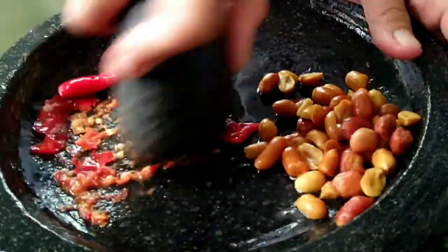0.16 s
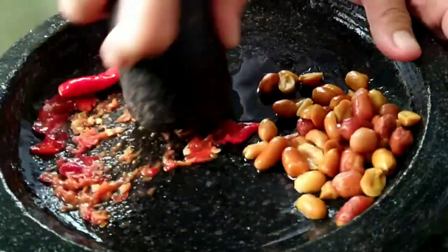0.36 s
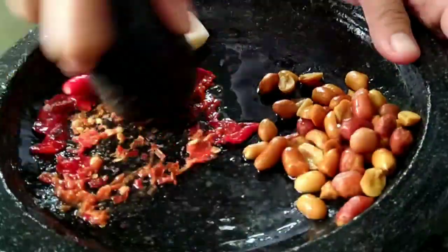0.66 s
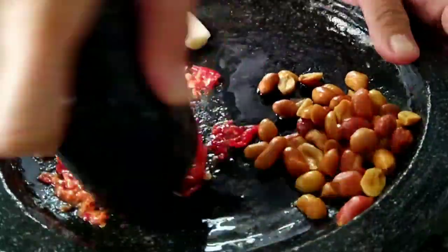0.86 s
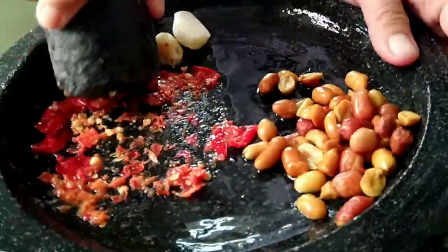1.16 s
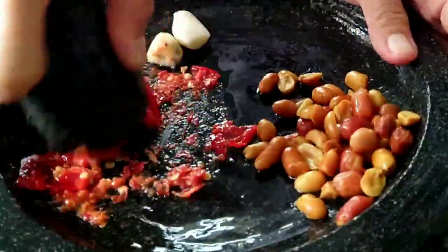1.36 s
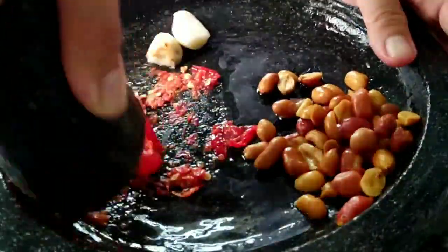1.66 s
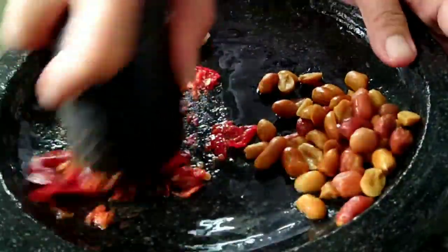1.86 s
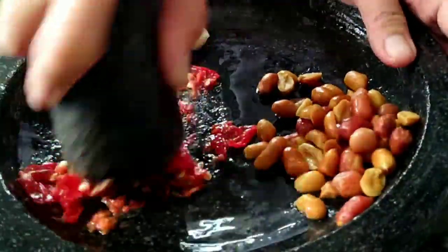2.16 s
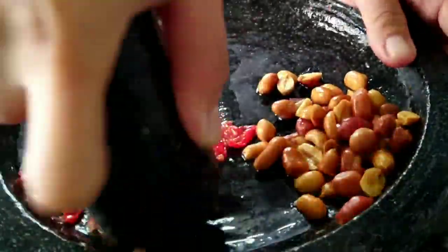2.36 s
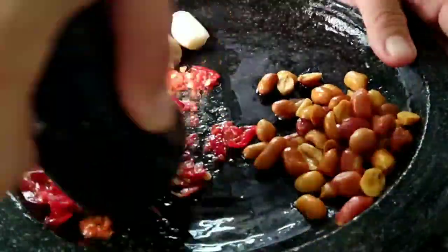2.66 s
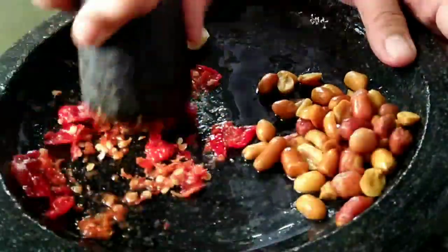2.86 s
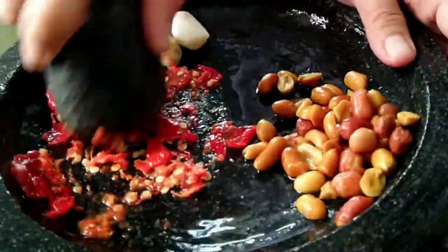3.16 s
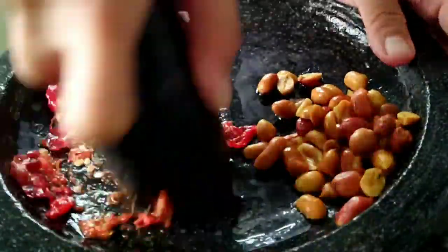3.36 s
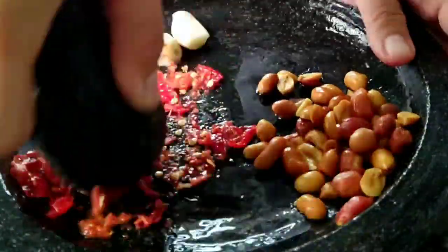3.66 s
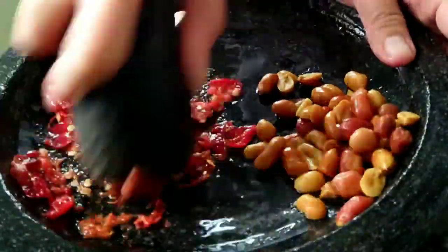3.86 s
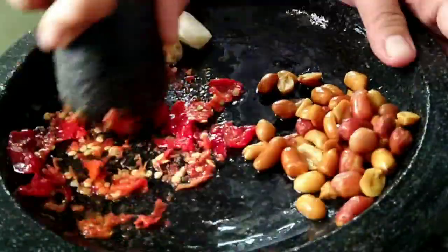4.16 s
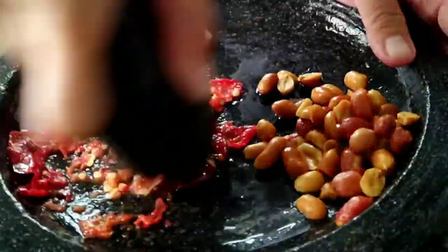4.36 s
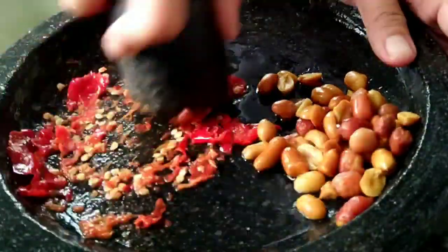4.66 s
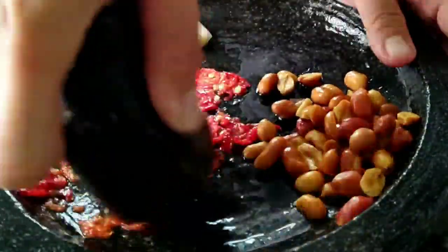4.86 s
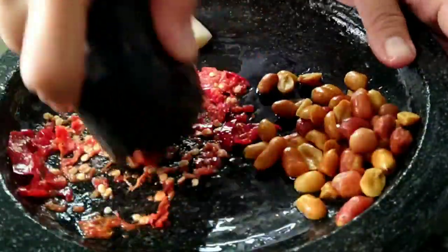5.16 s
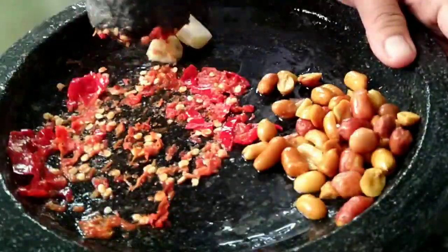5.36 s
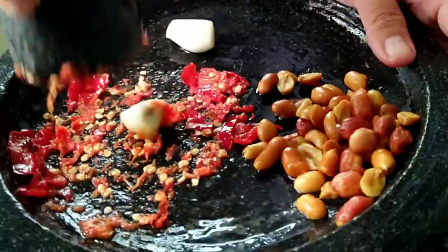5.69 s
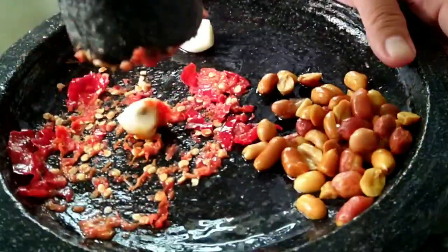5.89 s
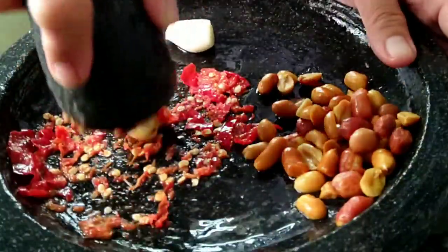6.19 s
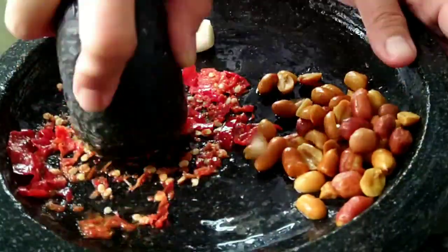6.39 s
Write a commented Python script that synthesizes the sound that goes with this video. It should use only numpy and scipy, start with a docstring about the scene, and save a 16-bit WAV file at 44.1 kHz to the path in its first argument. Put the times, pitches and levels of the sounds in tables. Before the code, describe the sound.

A stone pestle grinds chillies and seeds in a stone mortar, close to the microphone in a small kitchen. Short, uneven pushes make a wet, gritty crunch and a rasp, with seeds snapping now and then. Stone clacks on stone at irregular moments, each knock thudding through the table. Near the end a garlic clove is tapped and split with a crisp crack. An appliance hums faintly underneath.

```python
"""Wet grit crunches under a stone pestle: chillies and seeds in a shallow stone mortar on a kitchen table,
close to a stereo pair of microphones. Each push pops juice, rasps on the stone and makes the table
rumble; now and then stone clacks on stone and a seed snaps. At the end a garlic clove is tapped and
split. The small, hard room answers over the low hum of an appliance."""
import sys
import numpy as np
from scipy import signal
from scipy.fft import rfft, irfft, next_fast_len
from scipy.io import wavfile
from scipy.ndimage import uniform_filter1d, map_coordinates

SR = 44100
rng = np.random.default_rng(int(sys.argv[2]) if len(sys.argv) > 2 else 0)


def waveform_to_disk(signal):
    """Save audio, clipped to [-1, 1], as 16-bit WAV at the path in sys.argv[1]."""
    frames = np.transpose(np.atleast_2d(signal))
    scaled = np.clip(frames, -1, 1) * 32767
    samples = np.round(scaled).astype(np.int16)
    wavfile.write(sys.argv[1], SR, samples)


N = 287973
TIME = np.arange(N) / SR
AGE = np.arange(SR // 2) / SR  # seconds since a blow

# Levels in all tables are relative.
# pushes and drags of the pestle: start_s, length_s, grit_db, rasp_db, rumble_db
PUSHES = [(-0.001, 0.024, -48.0, -55, -54.5), (0.153, 0.039, -49, -52, -52.0),
          (0.253, 0.018, -45.5, -42, -46.5), (0.381, 0.14, -46, -47.5, -49),
          (0.777, 0.11, -44, -47.5, -49.5), (1.14, 0.0096, -64, -59, -46),
          (1.229, 0.078, -34.5, -43.5, -50), (1.433, 0.0086, -40.5, -44.5, -40),
          (1.52, 0.093, -43, -45.5, -47.5), (1.79, 0.011, -48.5, -52, -51.0),
          (1.851, 0.013, -40, -50.0, -44.5), (1.931, 0.029, -38, -38.5, -39.5),
          (2.061, 0.067, -45, -55, -63), (2.162, 0.027, -39.0, -48.5, -49.5),
          (2.26, 0.026, -55, -62, -51.5), (2.478, 0.042, -46, -45.5, -40.5), (2.611, 0.033, -46, -44, -57),
          (2.794, 0.09, -47.0, -61, -46.5), (2.912, 0.061, -43.5, -43.5, -43.5),
          (3.066, 0.057, -47.5, -51.5, -45), (3.163, 0.11, -52.5, -53.5, -59), (3.364, 0.01, -53, -59, -47),
          (3.439, 0.059, -43, -51, -42.5), (3.517, 0.091, -47, -52, -53.5), (3.749, 0.08, -48, -51.5, -48),
          (3.881, 0.029, -41, -40, -47.5), (4.083, 0.014, -50.5, -61, -65),
          (4.15, 0.15, -46.0, -49.5, -47.5), (4.446, 0.053, -41.0, -52.5, -42.5),
          (4.548, 0.033, -42.5, -41.5, -61), (4.668, 0.066, -47, -49.5, -37.5),
          (4.78, 0.11, -50, -51.5, -54), (5, 0.05, -45.5, -56, -43.5), (5.098, 0.027, -47, -52.5, -50.0),
          (5.474, 0.15, -60, -62, -54)]
# stone meets stone: start_s, level_db, hardness_db, table_thud_db
BLOWS = [(0.325, -34, -15, -42), (0.505, -32.5, -29, -35), (0.734, -19.5, -20, -24.5),
         (1.361, -34.5, -12, -45), (1.446, -24.5, -21, -32), (1.624, -19, -11.5, -35.5),
         (2.411, -1.5, -4, -23), (2.68, -30, -18, -43), (3.024, -26.5, -10, -42), (3.23, -42.5, -26, -55),
         (4.133, -14, -5, -34), (4.629, -26.5, -13.5, -51), (6.13, -33.5, -6, -38), (6.437, -23, -8, -30)]
# lingering modes of mortar and kitchen: pitch_hz, level_db, t60_s
RING_MODES = [(432, -3, 0.17), (605, 1.5, 0.11), (751, -12, 0.22), (793, -9.5, 0.1), (890, -13.5, 0.3),
              (950, -19.5, 0.38), (1061, -13, 0.25), (1130, -9.5, 0.22), (1383, -9, .17),
              (1483, -23.5, 0.13), (1621, -9.5, 0.31), (1640, -16, 0.26), (1766, -11, 0.11),
              (1910, -28, 0.28), (2305, -37, 0.27), (2490, -23, 0.45), (4270, -17.5, 0.14),
              (5300, -21, 0.38)]


def amp(db):
    """Decibels to gain."""
    return 10 ** (np.asarray(db) / 20)


def unit(x):
    """Scale to rms 1."""
    return x / np.sqrt(np.mean(x ** 2) + 1e-20)


def crest(x):
    """Scale a hit so that its loudest 4 ms have rms 1."""
    return x / np.sqrt(uniform_filter1d(np.mean(x ** 2, axis=0), size=176).max())


def along(points, hz):
    """Read (Hz, value) points on a log axis."""
    knots_hz, values = np.transpose(points)
    return np.interp(np.log(hz + 1), np.log(knots_hz), values)


def wobble(rate):
    """A smooth random curve, rate knots a second."""
    return map_coordinates(rng.standard_normal(int(N * rate / SR) + 4), [TIME * rate])


def add(track, start_s, sound):
    """Mix a sound into the track."""
    part = track[:, max(round(start_s * SR), 0):][:, :sound.shape[-1]]
    part += sound[..., :part.shape[1]]


def filtered(x, response):
    """Zero-phase filter with gain response(hz)."""
    n = x.shape[-1]
    size = next_fast_len(n + 8192)
    return irfft(rfft(x, size) * response(np.fft.rfftfreq(size, 1 / SR)), size)[..., :n]


def struck(x, level_db, size=2048):
    """Minimum-phase colouring by level_db(hz): nothing sounds before the blow."""
    cepstrum = irfft(np.log(amp(level_db(np.fft.rfftfreq(size, 1 / SR)))))
    cepstrum[1:size // 2] *= 2
    cepstrum[size // 2 + 1:] = 0
    impulse = irfft(np.exp(rfft(cepstrum)))
    return signal.fftconvolve(x, impulse[None], axes=1)[:, :x.shape[1]]


def spread(pair, colour):
    """Two unrelated signals become coloured stereo; both microphones hear nearly the same bass."""
    # likeness of left and right: frequency_hz, correlation
    likeness = [(130, 1), (290, 0.65), (640, 0.07), (1400, 0), (15000, 0.074)]
    turn = lambda hz: np.arccos(np.clip(along(likeness, hz), -1, 1)) / 2
    mid, side = filtered(pair, lambda hz: amp(along(colour, hz)) * [np.cos(turn(hz)), np.sin(turn(hz))])
    return unit(np.array([mid + side, mid - side]))


def ringing(modes, scatter_db, blur=0):
    """Damped modes at new strengths for every blow; blur makes each pitch waver by that share."""
    hz, db, t60 = np.transpose(modes)[:, :, None]
    drift = np.repeat(rng.standard_normal((len(hz), 90)), len(AGE) // 90, axis=1)
    phase = 2 * np.pi * hz * np.cumsum(1 + blur * drift, axis=1) / SR
    start_db = db + scatter_db * rng.standard_normal(db.shape)
    return np.sum(amp(start_db - 60 * AGE / t60) * np.sin(phase), axis=0)


def echoes(near_db, near_t60, room_db):
    """Stereo scatter from the bowl and table top, then the kitchen's tail."""
    # decay of the kitchen: frequency_hz, t60_s
    kitchen = [(200, 0.52), (1000, 0.12), (2000, 0.15), (6000, 0.34), (15000, 0.17)]
    hz, t, spectrum = signal.stft(rng.standard_normal((2, len(AGE))), SR, nperseg=256)
    decay = amp(-60 * t / along(kitchen, hz)[:, None])
    tail = signal.istft(spectrum * decay, SR, nperseg=256)[1][:, :len(AGE)]
    tail *= 1 - np.exp(-AGE / 0.0014)
    near = rng.standard_normal(tail.shape) * amp(-60 * AGE / near_t60)
    return (amp(near_db) * unit(near) + amp(room_db) * unit(tail)) / np.sqrt(len(AGE))


def pressure(level_db, attack_s, release_s, swell_db):
    """Each push comes in, swells while the hand leans on it and dies; attack and release span 20 dB."""
    start, length = np.transpose(PUSHES)[:2, :, None]
    clock = TIME[::64]
    age = clock - start
    outside = np.maximum(-age, 0) / attack_s + np.maximum(age - length, 0) / release_s
    db = level_db[:, None] + swell_db * (np.clip(age / length, 0, 1) - .5) - 20 * outside
    return np.interp(TIME, clock, np.linalg.norm(amp(db), axis=0))


def grains(per_s, size_db, clump_db):
    """Tiny fractures of uneven size come in clumps; their echoes change as the pestle travels."""
    sizes = amp(size_db * np.minimum(rng.exponential(size=N), 4)) * rng.choice([-1, 1], N)
    cracks = (rng.random(N) < per_s / SR) * sizes * amp(clump_db * wobble(110))
    out = np.zeros((2, N))
    block = SR // 12
    for start in range(0, N, block):
        path = echoes(near_db=3, near_t60=.02, room_db=0)[:, :SR // 5]
        path[0, 0] += 1  # direct sound, up to 13 samples later on the right
        path[1, rng.integers(14)] += 1
        add(out, start / SR, signal.fftconvolve(cracks[None, start:start + block], path, axes=1))
    return out


def patchy(x, depth_db):
    """The colour wanders as the pestle meets skin, seed and paste."""
    spectrum = signal.stft(x, nperseg=256)[2]
    field = rng.standard_normal(spectrum.shape[1:])
    for _ in range(2):
        field = uniform_filter1d(uniform_filter1d(field, size=7, axis=0), size=11, axis=1)
    return signal.istft(spectrum * amp(depth_db * unit(field)), nperseg=256)[1][:, :N]


def grit():
    """Fine grit bursts densely, with sparser cracks of seeds."""
    # spectrum of the crunch: frequency_hz, level_db
    colour = [(1180, -37), (2000, -20.5), (2400, -9), (3140, -7), (4150, -7), (4860, -3.5), (5490, -5),
              (6640, -5.5), (8930, -10.5), (14900, -16), (16000, -21)]
    fine = unit(patchy(grains(per_s=2200, size_db=4.5, clump_db=2.5), depth_db=2.3))
    seeds = unit(grains(per_s=70, size_db=3, clump_db=1))
    return amp(0.22) * spread(fine + 0.34 * seeds, colour)


def juice(per_s, pitch_hz, cycles, size_db):
    """Juice squeezed from the skins pops in tiny bubbles, each with its own short pitch."""
    when, pitch, luck, pan = rng.random((int(per_s * N / SR), 4)).T[:, :, None]
    hz = pitch_hz * 2 ** (pitch - .5)
    size = amp(-size_db * np.log(luck + .02))
    t = AGE[:SR // 50]
    pops = size * np.exp(-t * hz / cycles) * np.sin(2 * np.pi * hz * t)
    places = ((when * N).astype(int) + np.arange(len(t))).ravel()
    direct = np.array([np.bincount(places, (pops * share).ravel(), N)[:N] for share in (pan, 1 - pan)])
    room = signal.fftconvolve(direct, echoes(near_db=0, near_t60=.02, room_db=-2), axes=1)[:, :N]
    return amp(-7) * unit(direct + room)


def stone_rasp():
    """Stone slips on stone in tiny jerks that set the mortar ringing."""
    # spectrum of the slips: frequency_hz, level_db
    colour = [(200, -50), (340, -74), (430, 1), (510, -9.5), (610, 4), (900, 10), (1250, 8), (1700, 6),
              (2300, 2), (3200, -17), (6000, -48)]
    slips = spread(grains(per_s=1200, size_db=4.0, clump_db=1.5), colour)
    ring = signal.fftconvolve(slips, ringing(RING_MODES, scatter_db=0)[None], axes=1)[:, :N]
    return amp(-0.37) * slips + amp(-6) * unit(ring)


def table_rumble():
    """The grinding shakes the table under the mortar."""
    # spectrum of the shaking table: frequency_hz, level_db
    colour = [(20, -58), (60, -41.5), (110, -23), (145, 0.5), (168, 5), (205, -9.5), (275, -8), (340, -24),
              (600, -60.5)]
    return amp(2.03) * spread(rng.standard_normal((2, N)), colour)


def room_tone():
    """Low kitchen noise and the wavering hum of an appliance."""
    # spectrum of the room noise: frequency_hz, level_db
    colour = [(20, -31), (38, -8), (55, -2.5), (120, -2), (165, -2.5), (280, -6.5), (350, -36.5),
              (430, -6.5), (510, -19.5), (600, -12), (1000, -16), (2000, -22.5), (5000, -33.5),
              (15000, -43)]
    # tones of the appliance: pitch_hz, level_db
    tones = [(98, -59), (199, -59.5), (274, -68)]
    air = amp(-49) * spread(rng.standard_normal((2, N)), colour)
    hum = np.zeros(N)
    for hz, db in tones:
        level = np.sqrt(2) * amp(db + 2.8 * wobble(6))
        hum += level * np.sin(2 * np.pi * hz * TIME + 0.97 * wobble(4.9))
    return air + hum


def stone_clacks():
    """A soft first touch through the paste, then the hard blow of stone on stone."""
    # the mortar, damped by its load and the hand: pitch_hz, level_db, t60_s
    modes = [(430, -10, .06), (605, -13, .05), (885, -7, .035), (1150, -7, .02), (1560, 1, .02),
             (1740, -4, .035), (1950, -12, .02)]
    # spectrum of a blow's echoes: frequency_hz, level_db
    clatter = [(60, -57.5), (200, -27), (340, -32), (430, 7.5), (510, -12.5), (600, -3.5), (680, -7),
               (850, -2), (1250, -4), (1650, -4), (1900, -3.5), (2200, -14.5), (3000, -28), (6000, -39)]
    # early reflections off the walls: delay_s, level_db
    walls = [(.008, -5.5), (.034, -18.5)]
    clatter_db = lambda hz: along(clatter, hz)
    paste = [(800, 19), (1400, -32.5), (3000, -48)]  # frequency_hz, gain_db
    out = np.zeros((2, N))
    for start_s, db, hardness_db, _ in BLOWS:
        # each microphone faces its own mix of modes; the right one is a little farther off
        left, right = ringing(modes, scatter_db=2), ringing(modes, scatter_db=2)
        direct = unit(np.array([left, .85 * np.pad(right, (5, 0))[:len(AGE)]]))
        direct *= 1 - np.exp(-AGE / .0004)
        room = unit(struck(echoes(near_db=-4, near_t60=.05, room_db=0), clatter_db))
        ring = np.array([ringing(RING_MODES, scatter_db=2, blur=.013) for _ in range(2)])
        ring *= 1 - np.exp(-AGE / .008)
        # after a light blow the pestle stays down and damps the ring
        blow = unit(direct) + .55 * room + amp(-4 + .3 * db) * unit(ring)
        for delay_s, wall_db in walls:
            bounce = struck(echoes(near_db=-8.5, near_t60=0.017, room_db=0), clatter_db)
            add(blow, delay_s, amp(wall_db) * unit(bounce))
        # a harder, shorter contact reaches the upper modes; the stone radiates little bass
        contact = [(40, -1.5), (350, -20), (450, -6.5), (950, 4.5), (1600, 0.85 * hardness_db + 4.0)]
        blow = crest(struck(blow, lambda hz: along(contact, hz)))
        touch = crest(struck(blow, lambda hz: along(paste, hz)))
        add(out, start_s - .0059, amp(db - 22) * touch)
        add(out, start_s + 0.00035, amp(db - 4.0) * blow)
    return out


def table_thuds():
    """With every clack the pestle's weight lands and the table booms under the mortar."""
    # modes of the table: pitch_hz, level_db, t60_s
    modes = [(59.5, -22.5, 0.13), (100, -11.5, 0.064), (145.4, -16.5, 0.22), (169.5, 0, 0.16),
             (185.2, -1, 0.12), (227.5, -7, 0.14), (270.8, -10, 0.209), (423, -27, 0.13)]
    out = np.zeros((2, N))
    for start_s, _, _, db in BLOWS:
        boom = ringing(modes, scatter_db=1.0) * (1 - np.exp(-AGE / 0.021))
        add(out, start_s - .004, amp(db - 1.5) * crest(boom[None]))
    return out


def snaps():
    """Each burst is one sharp crack around a pitch of its own; big pieces sound broader."""
    # seeds, skins and garlic burst: start_s, level_db, pitch_hz, breadth_db
    bursts = [(0.7328, -21, 4900, 5), (0.7941, -31, 4700, -14), (1.1396, -33, 4500, -9),
              (1.214, -12.5, 5530, -10), (1.24, -26, 4400, -15), (1.2515, -12.5, 4780, -14.5),
              (1.267, -16, 5600, -15), (1.7767, -28.5, 5630, 0), (1.8694, -21.5, 4960, -25),
              (2.4124, -18.5, 4430, -5), (2.866, -23, 6330, -2), (2.9051, -17.5, 6750, -3),
              (3.1574, -28, 7460, -4), (3.7476, -34, 6500, -8), (3.993, -32.5, 5200, -7),
              (4.1312, -26, 5100, -4), (4.1636, -34, 6150, -6), (4.2321, -32, 6700, -5),
              (4.2804, -20.5, 6200, -4), (4.4263, -22, 7000, -5.5), (5.4668, -33.5, 3550, -15),
              (6.131, -24.5, 4700, 0), (6.4385, -7, 4480, 1.5)]
    # spectrum common to all cracks: frequency_hz, level_db
    colour = [(400, -36), (1200, -1), (2800, -5), (4500, -3), (6500, 2), (9000, -2.5), (13000, 0),
              (16000, -8)]
    out = np.zeros((2, N))
    for start_s, db, pitch_hz, breadth_db in bursts:
        crack = echoes(near_db=9, near_t60=0.042, room_db=2)
        crack[0, 0] += 1  # direct sound reaches the left microphone first
        crack[1, 6] += 1
        skirts = [(pitch_hz / 2, breadth_db + 4.5), (pitch_hz, 0), (2 * pitch_hz, breadth_db - 5.0)]
        peak_db = lambda hz: 10 / (1 + ((hz / pitch_hz - 1) / .08) ** 2)
        crack = struck(crack, lambda hz: along(colour, hz) + along(skirts, hz) + peak_db(hz))
        add(out, start_s, amp(db - 9.5) * crest(crack))
    return out


def scene():
    """The mortar from close up, a little nearer the left microphone."""
    # balance of the pair: frequency_hz, left_minus_right_db
    balance = [(200, 3), (600, 3.5), (1200, .5), (2400, 2), (4400, -1.5), (8100, 8), (15000, 2.5)]
    grit_db, rasp_db, rumble_db = np.transpose(PUSHES)[2:]
    crunch = grit() + juice(per_s=150, pitch_hz=5700, cycles=10, size_db=5)
    crunch *= pressure(grit_db, attack_s=0.052, release_s=0.081, swell_db=1.1)
    rasp = stone_rasp() * pressure(rasp_db, attack_s=0.098, release_s=0.079, swell_db=3.9)
    rumble = table_rumble() * pressure(rumble_db, attack_s=.07, release_s=0.11, swell_db=3.5)
    mix = crunch + rasp + rumble + stone_clacks() + table_thuds() + snaps() + room_tone()
    return filtered(mix, lambda hz: amp(np.outer([.5, -.5], along(balance, hz))))


def record(dry):
    """The hardest blow clips; the deepest bass and the highest treble are cut."""
    low_hz, top_hz = 32, 15750
    band = lambda hz: hz ** 4 / (hz ** 4 + low_hz ** 4) / (1 + (hz / top_hz) ** 120)
    return filtered(np.clip(dry, -1, 1), band)


dry = scene()
out = record(dry)
waveform_to_disk(out)
```